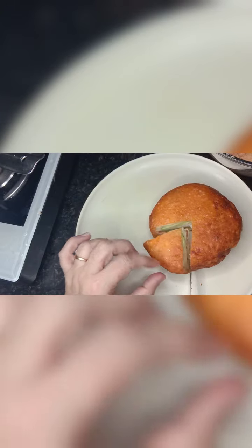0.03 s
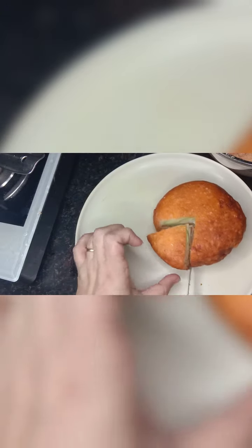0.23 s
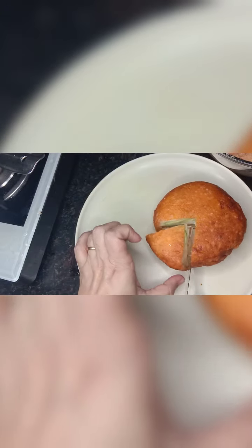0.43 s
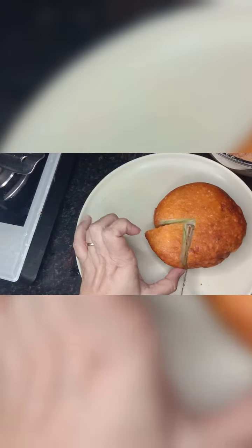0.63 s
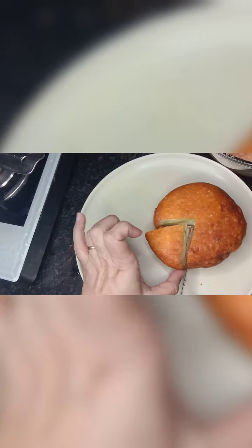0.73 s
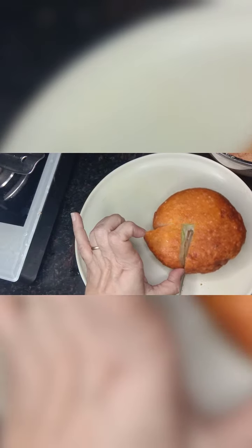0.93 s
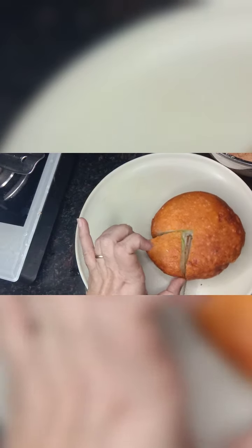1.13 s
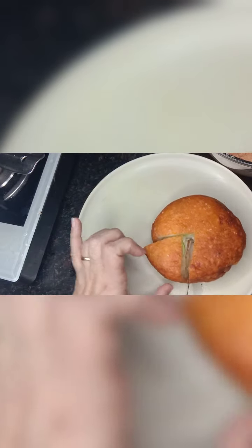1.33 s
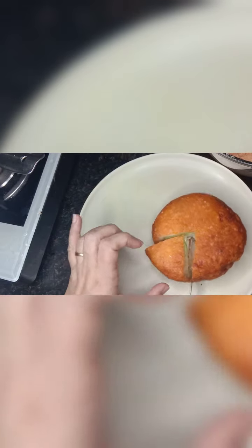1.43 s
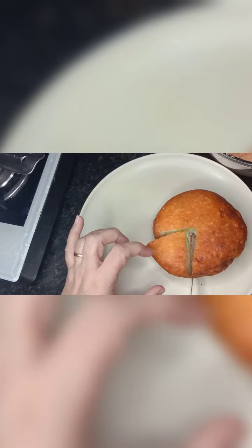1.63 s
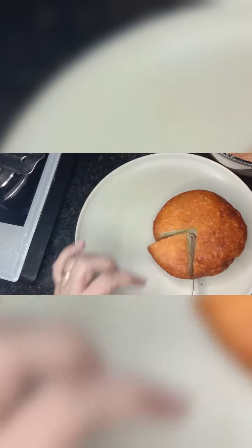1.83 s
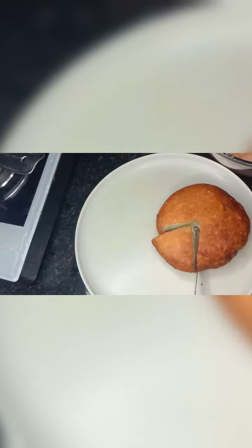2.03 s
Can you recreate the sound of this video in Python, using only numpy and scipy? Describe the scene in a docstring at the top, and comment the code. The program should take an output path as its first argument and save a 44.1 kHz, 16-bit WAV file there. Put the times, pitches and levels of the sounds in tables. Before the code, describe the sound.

A crisp bread crust crunches and snaps, then a plate knocks sharply, with light crackles and taps after.

```python
"""A crisp fried bread is handled on a china plate in a small kitchen, over a low hum and a faint hiss.
First the crust crunches and snaps: dense random fractures, coloured and passed through short resonances.
Then the plate gives a sharp double knock on the counter: impulses excite its damped modes, a crack and a thud.
Weaker crunches follow, then light crackles of finer grains, then small taps that sound short notes.
Soft bumps, made of swelling sines, run throughout; the room and the crockery ring briefly after contacts."""
import sys
import numpy as np
from scipy import signal
from scipy.fft import rfft, irfft
from scipy.io import wavfile

SR = 44100
rng = np.random.default_rng(int(sys.argv[2]) if len(sys.argv) > 2 else 0)


def persist_wave(psi):
    """Save psi, clipped to +-1, as 16-bit WAV."""
    counts = np.round(np.clip(psi, -1, 1) * 32767).astype(np.int16)
    wavfile.write(sys.argv[1], SR, np.atleast_2d(counts).T)


N = 92610
TIME = np.arange(N) / SR   # s

# Steady background. Room noise spectrum: frequency_hz, density_db
FLOOR_COLOUR = [(15, -61.5), (25, -29), (104, -3), (140, -14.5), (198, -11), (274, -17), (445, -17),
                (703, -22.5), (848, -25.5), (2060, -35), (3340, -33), (4260, -40.5), (5280, -39),
                (5730, -46), (15500, -49)]
# mains hum partials: frequency_hz, rms_level_db
HUM = [(50, -77.5), (100, -79.5), (200, -77), (300, -76.5)]
# crockery tones that linger faintly in the room: centre_hz, width_hz, rms_level_db
LINGER = [(1258, 85, -79), (2480, 18, -84.5), (505, 52, -81.5), (5420, 150, -88)]
# spectrum of a faint steady hiss, opposite in the two channels: frequency_hz, density_db
SIDE_COLOUR = [(50, -5.5), (300, -1), (1300, 0.5), (3000, -3), (6000, -10.5), (15000, -18.5)]
FLOOR_RMS_DB, SIDE_RMS_DB = -64, -81.5

# reverberation time of the room by band: centre_hz, t60_s
ROOM_T60 = [(100, 0.72), (400, 0.37), (1200, 0.47), (2500, 0.83), (6000, 0.43), (10000, 0.29),
            (16000, 0.16)]
EARLY_T60_S, EARLY_DB, ROOM_DELAY_S = 0.15, 1, 0.0041   # early level is relative to the tail
KNOCK_WET_DB, CRUST_WET_DB, TAP_WET_DB = -11, -9, -7.5   # sends to the room

# after-ring of the crockery, clusters of close, beating tones: centre_hz, width_hz, level_db, t60_s
RIM = [(1275, 123, -12, 1.1), (2430, 20, -18, 1.5), (5450, 200, -23.5, 1.0)]
TAP_RIM_DB, KNOCK_RIM_DB = 10.5, -5.5

# soft bumps through the counter: start_s, length_s, frequency_hz, level_db
BUMPS = [(0.14, 0.058, 169, -58), (0.24, 0.036, 165.8, -47.5), (0.235, 0.078, 103.7, -46),
         (0.39, 0.054, 101.8, -50.5), (0.70, 0.036, 108.7, -54.5), (0.80, .15, 102.6, -57.5),
         (1.08, 0.12, 505, -60.5), (1.275, 0.074, 103, -52), (1.419, .03, 104.6, -59.5),
         (1.635, 0.033, 121, -57.5), (1.805, 0.049, 306, -52), (1.81, 0.031, 404, -53.5),
         (1.81, 0.13, 199.7, -60), (1.82, 0.052, 100, -52.5), (1.96, 0.06, 100.5, -53.5)]

# light taps, each with a note set by where it lands: start_s, level_db, cutoff_hz, note_hz, note_level_db
TAPS = [(1.1697, -40, 4500, 2190, -55), (1.5555, -49.5, 7000, 2900, -64.5),
        (1.6467, -31.5, 2400, 1950, -54.5), (1.6480, -40, 2400, 1330, -53),
        (1.6512, -35.5, 2960, 2790, -53), (1.7775, -43, 4500, 4940, -53), (1.7889, -26, 15000, 1700, -39.5),
        (1.7902, -30, 11900, 4685, -49), (1.8013, -46, 12000, 3980, -49), (1.971, -32.5, 8000, 1884, -56),
        (1.981, -47, 5000, 2480, -53.5)]
# spectrum of a tap: frequency_hz, density_db
TAP_COLOUR = [(150, -9), (900, -15.5), (1350, 3.5), (1800, -2.5), (2300, -2), (2800, -10.5), (3300, -1.5),
              (4000, -11), (5500, -2.5), (6400, -23), (7200, -7.5), (9500, -19.5), (11000, -26),
              (15500, -20)]
# short resonances of a tap: frequency_hz, level_db, t60_s
TAP_MODES = [(1330, -18.5, 0.046), (1737, -31, 0.0078), (1993, -29, 0.038), (2790, -23, 0.037),
             (3916, -23, 0.021), (5070, -38, 0.015), (7000, -43, 0.017), (9400, -23.5, 0.011)]
TAP_COLOUR_GAIN_DB, TAP_NOTE_T60_S = 3.0, 0.026

# knocks of the plate on the counter: start_s, body_level_db, crack_level_db, thud_level_db
KNOCKS = [(0.2046, -24, -20.5, -30.5), (0.2063, -14, -33.5, -30.5), (0.2154, -16.5, -10, -2),
          (0.2190, -12.5, -35, -13.5)]
# damped modes of the loaded plate: frequency_hz, level_db, t60_s
PLATE_MODES = [(292, -16.5, 0.036), (387, -12, .04), (506, -15, 0.029), (650, -17, 0.043),
               (720, -25.5, 0.038), (925, -13.5, 0.037), (1183, -10, 0.015), (1248, -10.5, 0.053),
               (1350, -31.5, 0.01), (2050, -19, .015)]
# spectrum of the hard crack: frequency_hz, density_db
CRACK_COLOUR = [(200, -9), (1000, 9), (2200, -6), (3000, 4), (4500, 0), (7400, -8.5), (8200, -15.5),
                (11000, -19), (15500, -24)]
# spectrum of the counter thud, also used for the drag of the bread: frequency_hz, density_db
THUD_COLOUR = [(60, -32.5), (150, -20.5), (280, 16), (550, 7.5), (1200, 4), (1800, 0.5), (4000, -38.5),
               (16000, -69)]

# crunches of the crust against the plate: start_s, length_s, level_db, cutoff_hz
CRUNCHES = [(0.015, 0.26, -64.5, 1000), (0.107, 0.017, -55, 11100), (0.128, 0.025, -45, 12000),
            (0.168, 0.08, -47, 9630), (0.27, 0.075, -51.5, 3480), (0.40, 0.062, -57, 3000),
            (0.55, .13, -70, 9100), (1.772, 0.013, -58, 2500)]
# single snaps of the crust: start_s, level_db
SNAPS = [(0.0840, -37), (0.1075, -32), (0.1235, -28), (0.1283, -24.5), (0.1318, -24.5), (0.1410, -28.5),
         (0.1545, -32), (0.1610, -26), (0.1892, -35), (0.1950, -34)]
# spectrum of a crunch: frequency_hz, density_db
CRUNCH_COLOUR = [(100, -20), (450, -9.5), (900, 0.5), (1500, -1), (2050, 1), (2900, -6.5), (5600, -8),
                 (8000, -12), (10500, -16.5), (13000, -37), (15200, -16.5)]
# short resonances of a crunch: frequency_hz, level_db, t60_s
CRUNCH_MODES = [(660, -37, 0.05), (946, -22, 0.0078), (1397, -30, 0.0063), (2010, -29.5, 0.041),
                (2300, -41, 0.0098), (5630, -36, 0.011)]
# faint strokes of fine grains: start_s, length_s, level_db, cutoff_hz
FINE_STROKES = [(0.977, 0.079, -67, 12000), (1.066, 0.019, -58, 14000), (1.084, 0.018, -64, 16000),
                (1.10, .03, -80, 9000), (1.16, 0.016, -53, 3000), (1.765, .022, -62, 3000),
                (1.955, 0.023, -63, 9000), (1.97, 0.006, -50.5, 7000)]
# crumbs breaking under the fingers: start_s, level_db
CRUMBS = [(0.9815, -51), (1.0663, -45), (1.0868, -36), (1.0882, -34.5), (1.9521, -40), (1.9715, -43),
          (2.0463, -50.5)]
# spectrum of the fine crackle: frequency_hz, density_db
CRACKLE_COLOUR = [(200, -18), (1200, -2.5), (2200, -4), (3000, -6), (5200, 3), (8200, -7), (10500, -5),
                  (13500, -11), (15200, -3.5)]
# soft bread dragging on the plate: start_s, length_s, level_db, cutoff_hz
DRAGS = [(1.09, 0.084, -67.5, 900), (1.80, 0.057, -56, 1190), (1.965, .04, -61, 900)]
CRUNCH_COLOUR_GAIN_DB = -0.5
GRAINS_PER_S, GRAIN_SPREAD_DB = 1400, 3.5   # tiny grains within a stroke
SCATTER_DB, SCATTER_T60_S = 1, 0.035   # chatter that follows a contact

TAP_LOW_HZ, KNOCK_LOW_HZ, CRUNCH_LOW_HZ = 1000, 226, 520   # bass limits of the sources
LOW_CUT_HZ, HIGH_CUT_HZ = 13.6, 15700   # band limits of the whole


def from_db(db):
    """Level law: decibels to amplitude gain."""
    return 10 ** (np.asarray(db) / 20)


def at_hz(points, hz):
    """Spectral interpolation: read a table on a log-frequency axis."""
    frequency, value = np.transpose(points)
    return np.interp(np.log(np.maximum(hz, 1)), np.log(frequency), value)


def unit(x):
    """Energy normalisation: scale to energy one."""
    return x / np.sqrt(np.sum(x ** 2) + 1e-20)


def through(x, response):
    """Linear superposition: convolve a sound with an impulse response."""
    return signal.fftconvolve(x, response)[:N]


def colour(x, spectrum, size=8192):
    """Minimum-phase filtering: a causal response of unit energy with the given spectral shape."""
    hz = np.arange(size // 2 + 1) * SR / size
    cepstrum = irfft(np.log(from_db(at_hz(spectrum, hz))))
    # folding the cepstrum onto positive time makes the response causal
    cepstrum[1:size // 2] *= 2
    cepstrum[size // 2 + 1:] = 0
    response = irfft(np.exp(rfft(cepstrum)))
    return through(x, unit(response))


def dull(x, hz):
    """First-order low-pass: a softer contact loses its treble."""
    r = np.exp(-2 * np.pi * hz / SR)
    return signal.lfilter([1 - r], [1, -r], x + 1e-18)


def low_cut(x, hz):
    """Third-order high-pass: remove the bass."""
    high_pass = signal.butter(3, hz, "high", fs=SR, output="sos")
    return signal.sosfilt(high_pass, x + 1e-18)


def dying(t60):
    """Exponential decay: a fall of 60 dB in t60 seconds."""
    return np.exp(-np.log(1000) * TIME / max(t60, 1e-3))


def click(s, db):
    """Ideal impact: one impulse."""
    return from_db(db) * (np.arange(N) == int(s * SR))


def contact(s, db, size=3000):
    """Scattered impact: an impulse with a decaying burst of random chatter behind it."""
    chatter = rng.standard_normal(size) * dying(SCATTER_T60_S)[:size]
    burst = from_db(SCATTER_DB) * unit(chatter)
    burst[0] += 1
    out, start = np.zeros(N + size), int(s * SR)
    out[start:start + size] = from_db(db) * burst
    return out[:N]


def ring(x, modes, size=6000):
    """Modal resonance: decaying sines set off by x."""
    t = TIME[:size]
    response = sum(from_db(db - 60 * t / t60) * np.sin(2 * np.pi * hz * t) for hz, db, t60 in modes)
    return through(x, response)


def grains(strokes, attack_s, release_s):
    """Granular noise: dense tiny impulses of uneven size and sign, gated by each stroke."""
    sizes = from_db(GRAIN_SPREAD_DB * np.minimum(rng.exponential(1, N), 4))
    signs = rng.choice([-1, 1], N)
    happens = rng.random(N) < GRAINS_PER_S / SR
    impulses = unit(sizes * signs * happens) * np.sqrt(N)   # rms one
    out = np.zeros(N)
    for s, length, db, hz in strokes:
        attack = np.clip((TIME - s) / attack_s, 0, 1)
        release = np.exp(-np.maximum(TIME - s - length, 0) / release_s)
        out += dull(impulses * from_db(db) * attack * release, hz)
    return out


def cluster(hz, width_hz):
    """Beating: a narrow band of close tones with random phases, rms one."""
    f = np.arange(N // 2 + 1) * SR / N
    band = -2 * ((f - hz) / width_hz) ** 2
    phases = 2j * np.pi * rng.random(len(f))
    return unit(irfft(np.exp(band + phases), N)) * np.sqrt(N)


def background():
    """Stationary sound: coloured room noise, mains hum and faint lingering tones."""
    hum = sum(from_db(db) * np.sqrt(2) * np.sin(2 * np.pi * (hz * TIME + rng.random())) for hz, db in HUM)
    linger = sum(from_db(db) * cluster(hz, width) for hz, width, db in LINGER)
    floor = from_db(FLOOR_RMS_DB) * colour(rng.standard_normal(N), FLOOR_COLOUR)
    return hum + linger + floor


def side_hiss():
    """Opposite polarity: faint coloured hiss, added in one channel and subtracted in the other."""
    return from_db(SIDE_RMS_DB) * colour(rng.standard_normal(N), SIDE_COLOUR)


def kitchen():
    """Reverberation: dense early reflections and a tail that dies band by band."""
    white, hz = rfft(rng.standard_normal(N)), np.arange(N // 2 + 1) * SR / N
    tail = np.zeros(N)
    for centre, t60 in ROOM_T60:
        # overlapping triangular bands that sum to one
        weight = at_hz([(f, float(f == centre)) for f, _ in ROOM_T60], hz)
        tail += irfft(white * weight, N) * dying(t60)
    early = rng.standard_normal(N) * dying(EARLY_T60_S)
    build = np.clip(TIME / ROOM_DELAY_S - 1, 0, 1)   # silent for one delay, full after two
    return unit(tail * build) + from_db(EARLY_DB) * unit(early * build)


def rim(x):
    """Beating decay: the wavering after-ring of the crockery."""
    response = np.zeros(N)
    for hz, width, db, t60 in RIM:
        tones = unit(cluster(hz, width) * dying(t60))
        response += from_db(db) * np.sqrt(2 * width / SR) * tones   # wider bands carry more energy
    return through(x, response)


def bumps():
    """Amplitude envelope: dull resonances that swell and fade as the hand shifts its weight."""
    out = np.zeros(N)
    for s, length, hz, db in BUMPS:
        swell = np.sin(np.pi * np.clip((TIME - s) / length, 0, 1))
        out += from_db(db) * swell * np.sin(2 * np.pi * hz * (TIME - s))
    return out


def taps():
    """Impact excitation: small hard touches sound short notes and leave the rim ringing."""
    touches = sum(dull(dull(contact(s, db), hz), hz) for s, db, hz, _, _ in TAPS)
    notes = sum(ring(click(s, db), [(hz, 0, TAP_NOTE_T60_S)]) for s, _, _, hz, db in TAPS)
    noise = from_db(TAP_COLOUR_GAIN_DB) * colour(touches, TAP_COLOUR)
    direct = low_cut(noise + ring(touches, TAP_MODES) + notes, TAP_LOW_HZ)
    return direct + from_db(TAP_RIM_DB) * rim(direct)


def knocks():
    """Modal impact: each knock rings the plate, with a hard crack and a thud of the counter."""
    body = ring(sum(click(s, db) for s, db, _, _ in KNOCKS), PLATE_MODES)
    crack = colour(sum(contact(s, db) for s, _, db, _ in KNOCKS), CRACK_COLOUR)
    thud = colour(sum(click(s, db) for s, _, _, db in KNOCKS), THUD_COLOUR)
    direct = low_cut(body + crack + thud, KNOCK_LOW_HZ)
    return direct + from_db(KNOCK_RIM_DB) * rim(direct)


def crust():
    """Brittle fracture: coarse crunches on the plate, fine crackle, drag of the soft underside."""
    coarse = grains(CRUNCHES, attack_s=0.0024, release_s=0.0083)
    coarse = coarse + sum(contact(s, db) for s, db in SNAPS)
    fine = grains(FINE_STROKES, attack_s=0.0043, release_s=0.0069)
    fine = fine + sum(contact(s, db) for s, db in CRUMBS)
    drag = grains(DRAGS, attack_s=0.0059, release_s=0.0079)
    noise = from_db(CRUNCH_COLOUR_GAIN_DB) * colour(coarse, CRUNCH_COLOUR)
    crunch = low_cut(noise + ring(coarse, CRUNCH_MODES), CRUNCH_LOW_HZ)
    return crunch + colour(fine, CRACKLE_COLOUR) + colour(drag, THUD_COLOUR)


def scene():
    """Superposition: all sources sit in the centre; only a faint hiss spreads sideways."""
    tap, knock, bread = taps(), knocks(), crust()
    send = from_db(KNOCK_WET_DB) * knock + from_db(CRUST_WET_DB) * bread + from_db(TAP_WET_DB) * tap
    reverberant = through(send, kitchen())
    mid = background() + bumps() + tap + knock + bread + reverberant
    side = side_hiss()
    return np.array([mid + side, mid - side])


def record(dry):
    """Band limiting: remove the deep bass, and cut the top steeply with an elliptic filter."""
    low_pass = signal.ellip(12, .1, 80, HIGH_CUT_HZ, fs=SR, output="sos")
    return signal.sosfilt(low_pass, low_cut(dry, LOW_CUT_HZ))


dry = scene()
out = record(dry)
persist_wave(out)
```